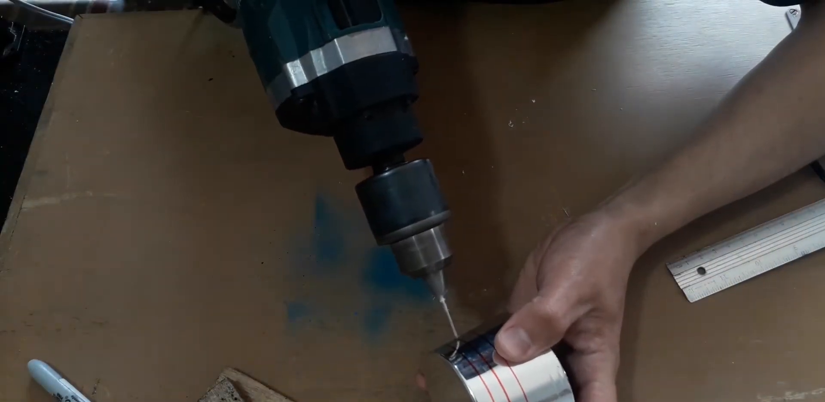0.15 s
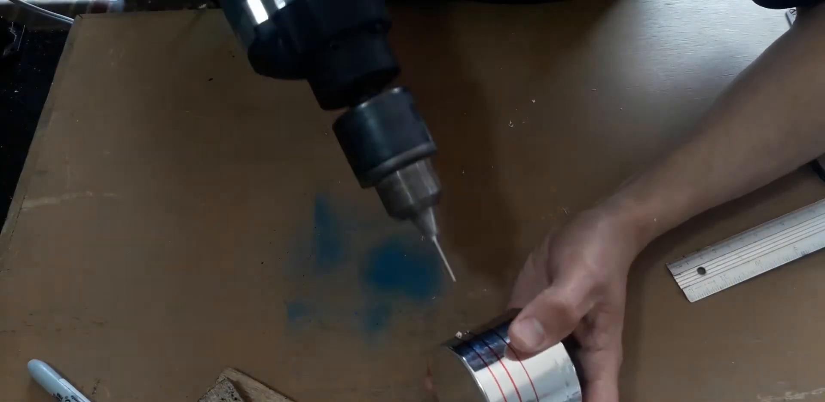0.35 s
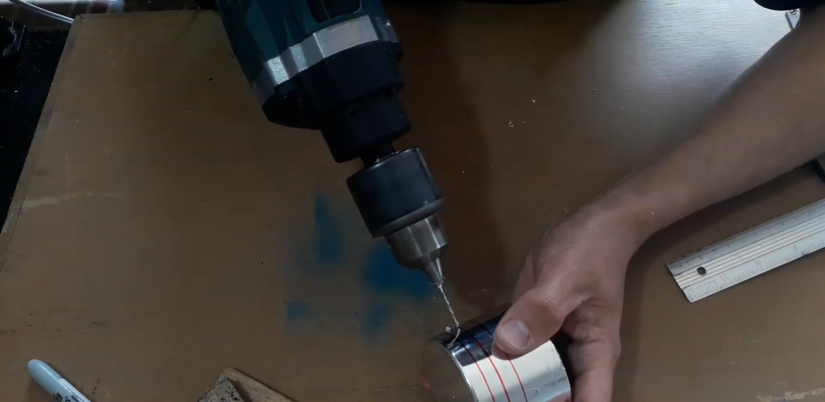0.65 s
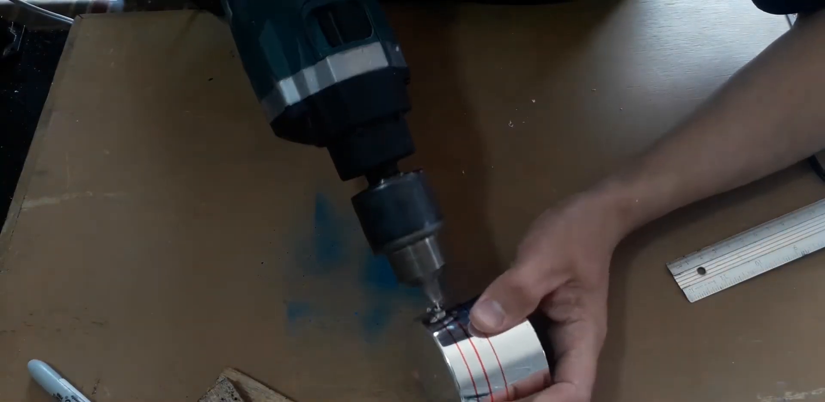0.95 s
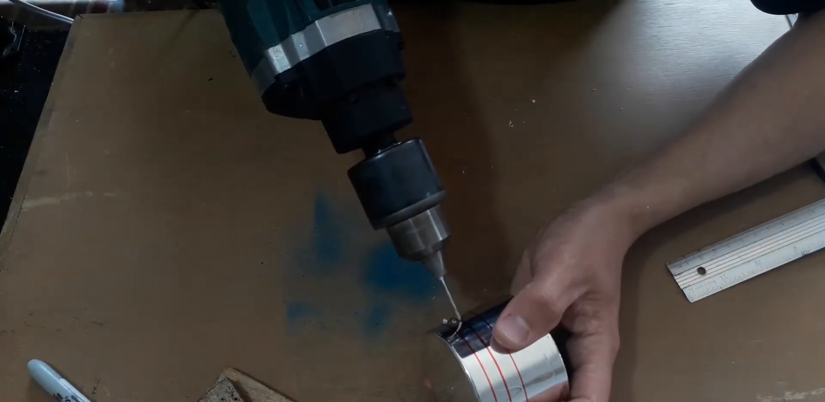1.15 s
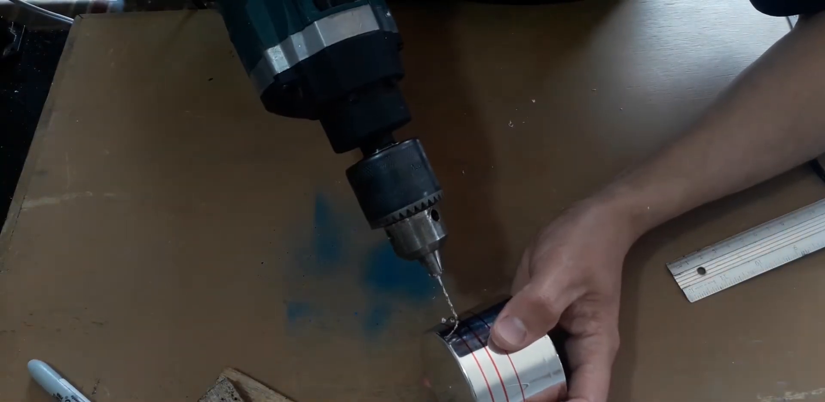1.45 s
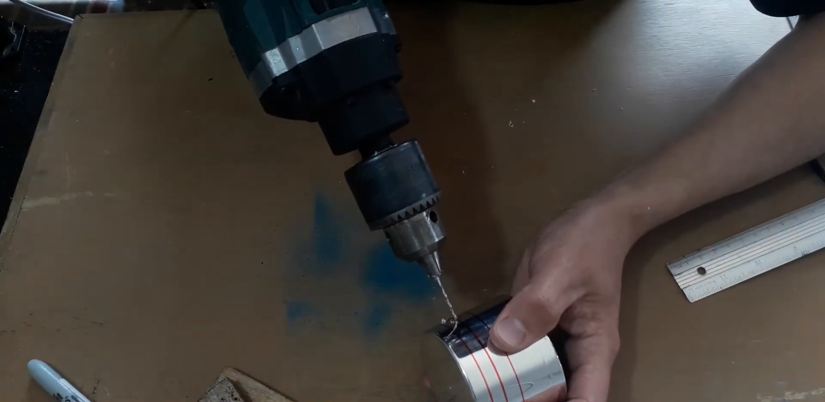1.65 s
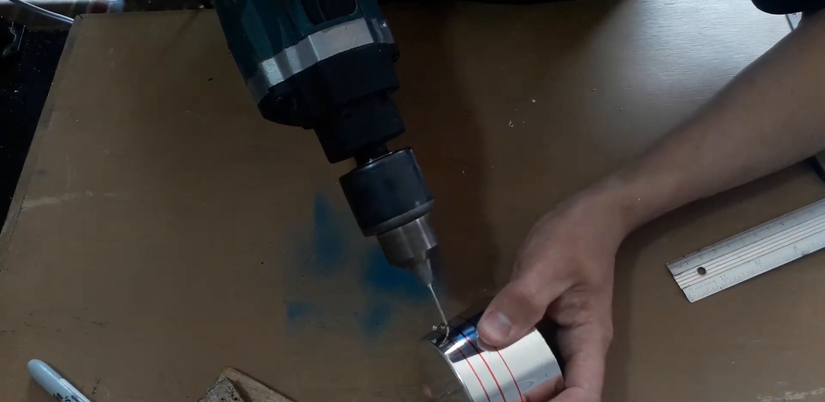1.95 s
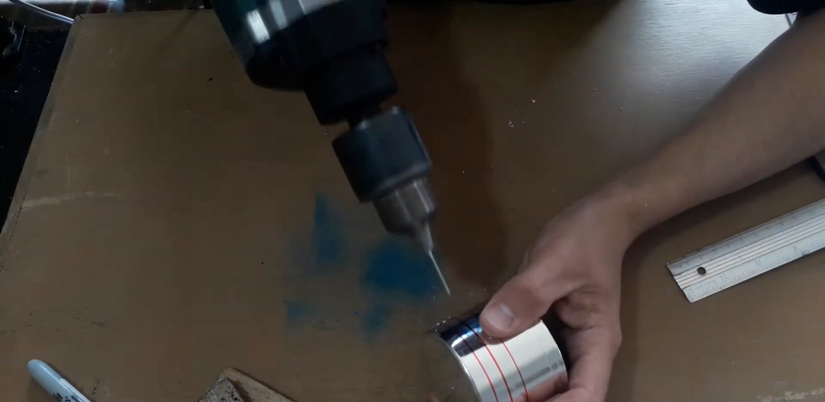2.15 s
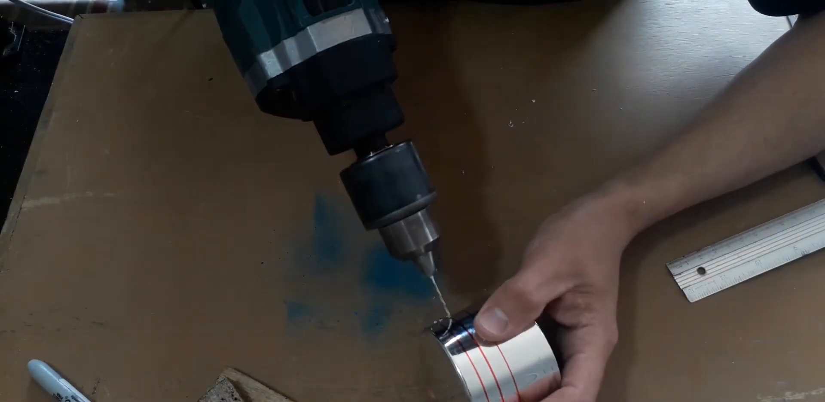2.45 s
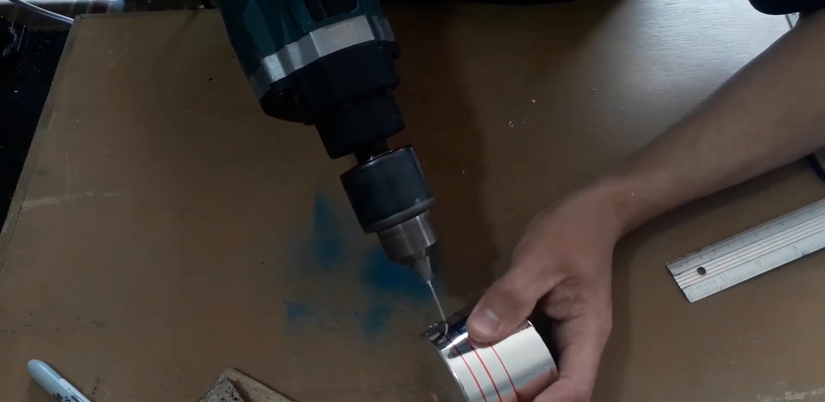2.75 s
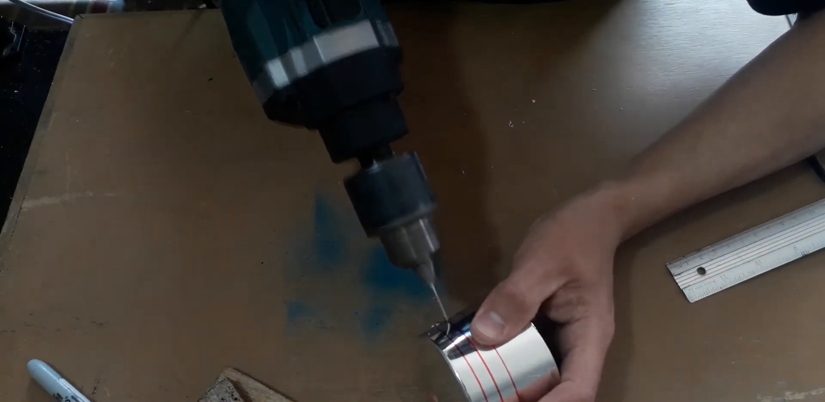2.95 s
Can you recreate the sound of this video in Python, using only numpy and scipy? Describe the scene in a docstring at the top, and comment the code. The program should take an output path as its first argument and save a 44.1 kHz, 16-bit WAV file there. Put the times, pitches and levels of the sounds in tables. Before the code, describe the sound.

Close up in a small room, an electric drill bores into plastic with two quick whining bursts that coast down. After faint clicks and hand rubs, two more bursts follow, the last one longer.

```python
"""Electric drill in plastic

Four short bursts, close up in a small room, mono. Each time the motor squeals as it spins up,
whines with fan and gears over the hiss of its brushes, then coasts down. The bit chatters and
squeaks as it cuts. In the pause the work is handled with light clicks and rubs."""
import sys
import numpy as np
from scipy import signal
from scipy.fft import rfft, irfft, next_fast_len
from scipy.io import wavfile
from scipy.ndimage import uniform_filter1d, map_coordinates

SR = 44100
rng = np.random.default_rng(int(sys.argv[2]) if len(sys.argv) > 2 else 0)


def pcm_store(signal):
    """Save signal as 16-bit PCM."""
    levels = np.round(np.clip(np.atleast_2d(signal), -1, 1) * 32767)
    wavfile.write(sys.argv[1], SR, levels.astype(np.int16).T)


N = 136710

# trigger pulls (on [s], release [s], at rest [s], target whine [Hz], spin-up constant [s], drag [1])
PULLS = [(-0.165, 0.286, 0.775, 1778, 0.2023, 0.38), (0.803, 0.984, 1.45, 1854, 0.0997, 0.54),
         (1.922, 2.099, 2.63, 2092, 0.0875, 0.52), (2.62, 3.002, 3.54, 2049, 0.0849, 0.47)]
# fan whine through the housing (pitch [Hz], level [dB])
FAN_LEVELS = [(500, -75), (750, -61), (1000, -57), (1200, -47), (1400, -37), (1550, -34), (1800, -32),
              (1935, -21), (2045, -29.5)]
# gear and fan partials (whine multiple [1], roughness [0-1], base level in pull 1, 2, 3, 4 [dB])
GEAR_PARTIALS = [(2, 0.4, -38, -38, -35, -33), (2.55, 0.3, -36, -35, -32.5, -32.5),
                 (3, .2, -36, -41, -37, -35.5), (4.01, 0.4, -38.5, -32.5, -32, -33),
                 (4.49, 1, -35.5, -39, -34, -44), (5.01, 0.6, -37, -36, -38, -38),
                 (5.1, 0.6, -45, -42.5, -49, -38.5), (6.5, 1, -41, -38, -40, -47),
                 (7.65, .5, -36.5, -32, -45, -38), (8.01, 0.8, -32, -43, -35, -42)]
# brush hiss against speed (whine pitch [Hz], base level [dB])
BRUSH_LEVELS = [(15, -67.5), (60, -59), (150, -49.5), (450, -39.5), (1000, -32), (1500, -27.5),
                (2000, -25.5)]
# brush hiss at speed (frequency [Hz], relative level [dB])
FAST_HISS_SPECTRUM = [(60, -47), (150, -41.5), (500, -24.5), (1000, -19.5), (1500, -12.5), (2700, -2.5),
                      (3400, -6), (4300, -2.5), (8500, -3.5), (12000, -0.5), (15800, -4)]
# brush hiss at low speed (frequency [Hz], relative level [dB])
SLOW_HISS_SPECTRUM = [(100, -49.5), (300, -31.5), (700, -19), (1000, -21), (1350, -9.5), (1850, -13),
                      (2300, -0.5), (2900, -2.5), (3500, -10.5), (6600, -1), (10000, 1), (15800, -3.5)]
# spin-up squeals (peak time [s], level [dB])
SPIN_UP_SQUEALS = [(.003, -20.5), (0.876, -20.5), (1.976, -19), (2.678, -20)]
# gears taking up slack (frequency [Hz], relative level [dB])
JOLT_SPECTRUM = [(80, -43), (500, -27), (1800, -6.5), (2400, 0.5), (3100, 4), (4500, -20), (12000, -24)]
# bit cutting (start [s], end [s], level [dB])
CUT_SPANS = [(0.126, .35, -48.5), (0.924, 1.04, -42.5), (2.05, 2.125, -40.5), (2.265, 2.31, -57),
             (2.705, 2.98, -63)]
# bit chatter (frequency [Hz], relative level [dB])
CHATTER_SPECTRUM = [(50, -30), (100, -19), (145, -1.5), (200, -4.5), (550, 1), (1000, 5), (2500, 3.5),
                    (8000, -35.5)]
# bit squeaking in the hole (time [s], pitch [Hz], level [dB])
BIT_SQUEAKS = [(1.011, 495, -39), (2.106, 510, -44)]
# handling clicks (time [s], level [dB])
HANDLING_CLICKS = [(1.4473, -51), (1.8048, -42.5)]
# modes of the clicked plastic (frequency [Hz], relative level [dB], T60 [s])
PLASTIC_MODES = [(1324, 5, 0.052), (1975, -12, 0.062), (2169, -15, 0.07), (2690, -23, 0.1)]
# hand rubs (time [s], sigma [s], level [dB], ring pitch [Hz])
HAND_RUBS = [(1.53, 0.014, -63, 3454), (1.578, 0.0076, -65, 2320), (1.631, 0.02, -63.5, 2776),
             (1.68, 0.017, -70, 2380), (1.893, 0.013, -64.5, 2530)]
# rubs and click tails (frequency [Hz], relative level [dB])
RUB_SPECTRUM = [(100, -22), (700, -13), (1600, 0.5), (2700, 3), (4500, -12), (15000, -37)]
# room background (frequency [Hz], relative level [dB])
FLOOR_SPECTRUM = [(30, -53.5), (150, -26), (400, -12), (650, -3), (1500, -10), (4000, -22.5), (15000, -33)]

FAN_BLADES, BAND_LIMIT_HZ = 10, 15880


def rotor(current_rise_s=0.0053, current_fall_s=0.007):
    """Whine pitch and current: the motor speeds up under power, then friction and drag slow it."""
    t, pitch_hz, current = clock(), np.ones(N), np.zeros(N)
    for on, release, rest, target_hz, spin_s, drag in PULLS:
        driven_hz = target_hz * (1 - np.exp(-(np.clip(t, on, release) - on) / spin_s))
        coast = np.clip((t - release) / (rest - release), 0, 1)
        pitch_hz = np.maximum(pitch_hz, driven_hz * (1 - coast) * np.exp(-drag * coast))
        current += np.clip((t - on) / current_rise_s, 0, 1) * np.clip((release - t) / current_fall_s, 0, 1)
    return uniform_filter1d(pitch_hz, size=300) * (1 + 0.0021 * wobble(40)), current


def motor(pitch_hz, current, full_speed_hz=1913, hum_db_per_decade=96):
    """The fan whines at blade rate; rotor unbalance hums once a turn."""
    phase = phase_of(pitch_hz)
    whine = amp(along(FAN_LEVELS, pitch_hz)) * tone(phase, rough=0.2, width_hz=150)
    hum_db = -65.5 + hum_db_per_decade * np.log10(pitch_hz / full_speed_hz)
    hum = amp(hum_db) * np.sin(phase / FAN_BLADES) * (.4 + current)
    return highpass_gain(pitch_hz, 640, order=6) * (whine + hum)


def gears(pitch_hz, current, mesh_multiple=2.65, case_hz=2420, case_width_hz=550):
    """Each pull has its own partials; those near the mesh tone flare in the case resonance."""
    on, release = np.transpose(PULLS)[:2]
    pull = np.searchsorted(on, clock()) - 1
    speed_decades = np.log10(pitch_hz / np.interp(release, clock(), pitch_hz)[pull])
    flare_db = 16.5 - 6 * current  # taut gears ring the case less
    phase, out = phase_of(pitch_hz), np.zeros(N)
    for multiple, rough, *levels_db in GEAR_PARTIALS:
        hz = multiple * pitch_hz
        near_mesh = np.exp(-2 * (multiple - mesh_multiple) ** 2)
        case_db = near_mesh * flare_db / (1 + (2 * (hz - case_hz) / case_width_hz) ** 2)
        speed_db = (3 + 13 * multiple) * speed_decades
        gain = amp(np.array(levels_db)[pull] + speed_db + case_db) * highpass_gain(hz, 2100, order=8)
        out += gain * tone(multiple * phase, rough, width_hz=60 * multiple)
    return out * highpass_gain(pitch_hz, 800, order=6)


def brushes(pitch_hz, current, sparks_per_s=2500, spark_share=0.17, slow_hz=600, fast_hz=1500):
    """Brushes scrape and spark on the commutator, pulsing twice a turn; speed sets level and colour."""
    sparks = unit(noise() * (rng.random(N) < sparks_per_s / SR))
    scrape = np.sqrt(1 - spark_share) * noise() + np.sqrt(spark_share) * sparks
    scrape *= 1 + 0.13 * np.sin(2 * phase_of(pitch_hz) / FAN_BLADES)
    fast = np.clip((pitch_hz - slow_hz) / (fast_hz - slow_hz), 0, 1)
    hiss = fast * amp(3) * coloured(scrape, FAST_HISS_SPECTRUM)
    hiss += (1 - fast) * amp(4.5) * coloured(scrape, SLOW_HISS_SPECTRUM)
    sparking_db = 2 * current
    level_db = along(BRUSH_LEVELS, pitch_hz) + sparking_db + .5 * wobble(70)
    turning = np.clip((pitch_hz - 1) / 20, 0, 1)
    return room(hiss) * turning * amp(level_db)


def squeals(centre_hz=11360, rise_hz_per_s=80000, catch_hz=10100, rattle_hz=413, case_hz=2416):
    """A rising, rattling squeal as the rotor picks up speed; it also rings the gear case."""
    t, out = clock(), np.zeros(N)
    for at_s, db in SPIN_UP_SQUEALS:
        glide_hz = np.clip(centre_hz + rise_hz_per_s * (t - at_s), centre_hz / 2, BAND_LIMIT_HZ)
        rattle = 1 + .35 * np.sin(2 * np.pi * rattle_hz * (t - at_s))
        squeal = rattle * tone(phase_of(glide_hz), rough=.55, width_hz=1900)
        case = tone(phase_of(glide_hz * case_hz / centre_hz), rough=0.92, width_hz=710)
        caught = .5 + .5 * np.tanh((glide_hz - catch_hz) / 400)
        out += amp(db) * caught * swell(at_s, sigma_s=0.011) * (squeal + amp(-14) * case)
    return out


def jolts(level_db=-40.5, rise_s=0.0047, t60_s=.3):
    """A short rasp as the gears take up their slack at each start."""
    t, envelope = clock(), np.zeros(N)
    for on, *_ in PULLS:
        envelope += np.clip((t - on) / rise_s, 0, 1) * amp(level_db - 60 * np.abs(t - on) / t60_s)
    return envelope * coloured(noise(), JOLT_SPECTRUM)


def bit(knocks_per_s=47.26):
    """The cutting edges catch the plastic in dull regular knocks, and now and then squeak."""
    knocks = np.zeros(N)
    for start_s, end_s, db in CUT_SPANS:
        for at_s in np.arange(start_s, end_s, 1 / knocks_per_s):
            knocks += amp(db) * swell(at_s, sigma_s=0.0031)
    out = knocks * coloured(noise(), CHATTER_SPECTRUM)
    for at_s, hz, db in BIT_SQUEAKS:
        phase = 2 * np.pi * hz * clock()
        out += amp(db) * swell(at_s, sigma_s=0.0046) * (np.sin(phase) + np.sin(2 * phase))
    return out


def clicks(crack_t60_s=0.013, tail_t60_s=0.043):
    """Handled plastic clicks: ringing modes, a bright crack and a duller tail."""
    out = np.zeros(N)
    strongest_db = max(db for _, db, _ in PLASTIC_MODES)
    for at_s, db in HANDLING_CLICKS:
        t = np.maximum(clock() - at_s, 0)
        ring = sum(amp(mode_db - strongest_db - 60 * t / t60_s) * np.sin(2 * np.pi * hz * t)
                   for hz, mode_db, t60_s in PLASTIC_MODES)
        crack = amp(3.5 - 60 * t / crack_t60_s) * filtered(noise(), lambda hz: hz / (hz + 1500))
        tail = amp(-2.5 - 60 * t / tail_t60_s) * coloured(noise(), RUB_SPECTRUM)
        out += amp(db) * (t > 0) * (amp(-3) * ring + crack + tail)
    return out


def rubs():
    """Soft rubs of the hand, each ringing the work at one pitch."""
    out = np.zeros(N)
    for at_s, sigma_s, db, hz in HAND_RUBS:
        ring = tone(2 * np.pi * hz * clock(), rough=0.91, width_hz=260)
        friction = coloured(noise(), RUB_SPECTRUM)
        out += amp(db) * swell(at_s, sigma_s) * (amp(-3) * friction + amp(-3.5) * ring)
    return out


def room(x, t60_s=0.15, wet_db=-2):
    """Bench and near walls add a short tail; the level stays the same."""
    t = np.arange(SR // 4) / SR
    tail = rng.standard_normal(len(t)) * amp(-60 * t / t60_s)
    wet = signal.fftconvolve(x, tail / np.linalg.norm(tail))[:N]
    return (x + amp(wet_db) * wet) / np.sqrt(1 + amp(wet_db) ** 2)


def background(level_db=-69.5):
    """Faint steady room noise."""
    return amp(level_db) * coloured(noise(), FLOOR_SPECTRUM)


def amp(db):
    """Decibels to gain."""
    return 10 ** (np.asarray(db) / 20)


def unit(x):
    """Scale to rms 1."""
    return x / np.sqrt(np.mean(x ** 2) + 1e-20)


def clock():
    """Sample times in seconds."""
    return np.arange(N) / SR


def along(points, hz):
    """(Hz, value) points read on a log axis."""
    knots_hz, values = np.transpose(sorted(points))
    return np.interp(np.log(hz + 1), np.log(knots_hz + 1), values)


def highpass_gain(hz, corner_hz, order):
    """Butterworth high-pass magnitude."""
    return 1 / np.sqrt(1 + (corner_hz / hz) ** (2 * order))


def filtered(x, response):
    """Apply a frequency response to x."""
    size = next_fast_len(N + 8192)
    return irfft(rfft(x, size) * response(np.fft.rfftfreq(size, 1 / SR)), size)[..., :N]


def coloured(x, spectrum):
    """x shaped by (Hz, dB) points, at rms 1."""
    return unit(filtered(x, lambda hz: amp(along(spectrum, hz))))


def noise():
    """White noise."""
    return rng.standard_normal(N)


def wobble(knots_per_s):
    """Smooth random curve at rms 1."""
    return unit(map_coordinates(noise(), [clock() * knots_per_s], mode="wrap"))


def phase_of(hz):
    """Running phase of a pitch curve."""
    return 2 * np.pi * np.cumsum(hz) / SR


def tone(phase, rough, width_hz):
    """A partial of rms 1; rough is the share of its power in narrow noise."""
    fuzz = wobble(width_hz) * np.sin(phase) + wobble(width_hz) * np.cos(phase)
    return np.sqrt(2 * (1 - rough)) * np.sin(phase) + np.sqrt(rough) * fuzz


def swell(at_s, sigma_s):
    """Gaussian envelope."""
    return np.exp(-.5 * ((clock() - at_s) / sigma_s) ** 2)


def scene():
    """The drill and the work in a quiet room, the same in both ears."""
    pitch_hz, current = rotor()
    drill = motor(pitch_hz, current) + gears(pitch_hz, current) + jolts() + brushes(pitch_hz, current)
    mono = drill + bit() + room(squeals() + rubs() + clicks()) + background()
    return np.array([mono, mono])


def record(dry, low_cut_hz=95, edge_hz=70):
    """Microphone bass roll-off and a steep band limit."""
    def response(hz):
        bass = .1 + .9 * hz ** 4 / (hz ** 4 + low_cut_hz ** 4)
        return bass * (.5 - .5 * np.tanh((hz - BAND_LIMIT_HZ) / edge_hz))
    return filtered(dry, response)


dry = scene()
out = record(dry)
pcm_store(out)
```